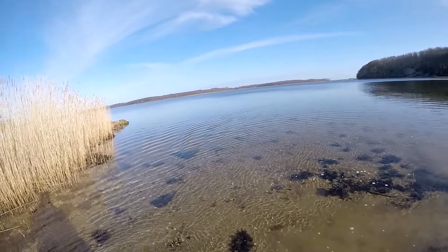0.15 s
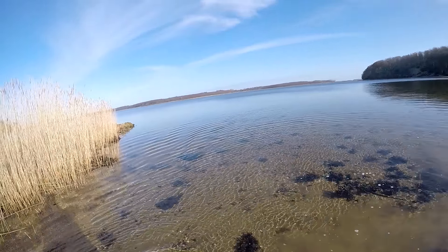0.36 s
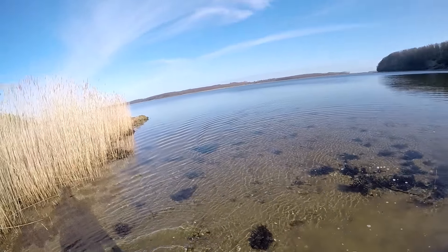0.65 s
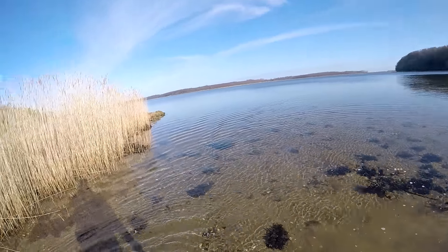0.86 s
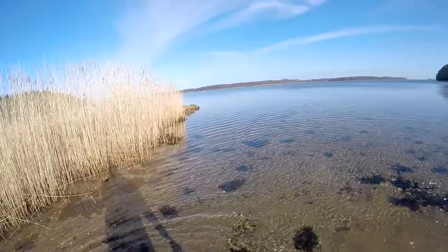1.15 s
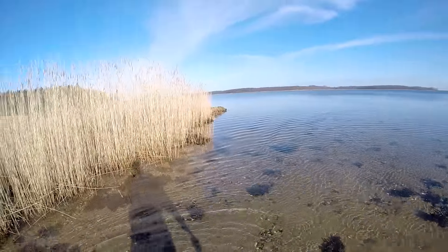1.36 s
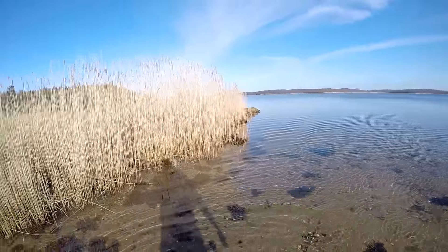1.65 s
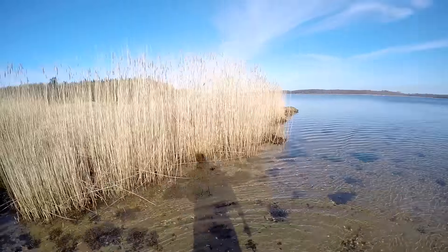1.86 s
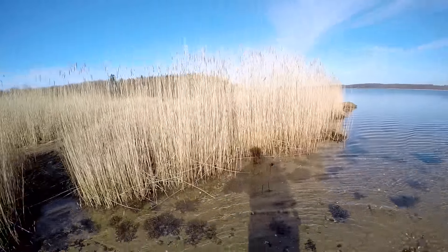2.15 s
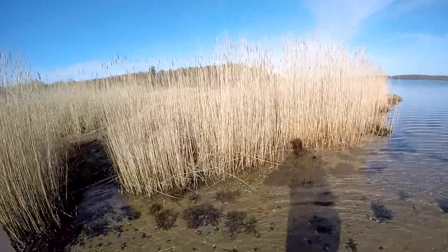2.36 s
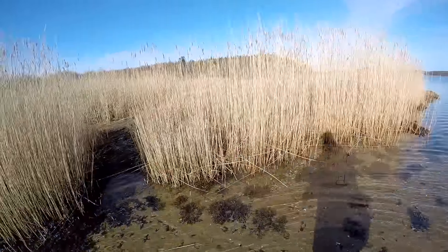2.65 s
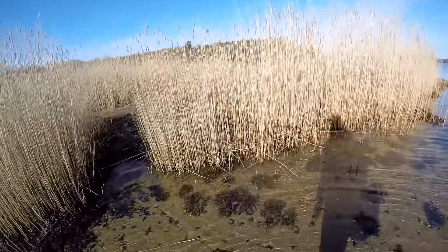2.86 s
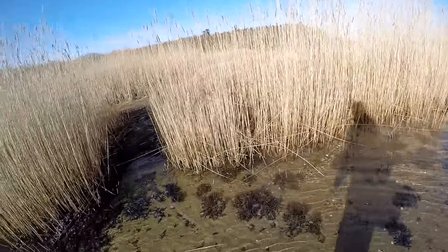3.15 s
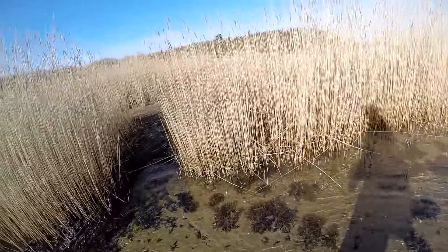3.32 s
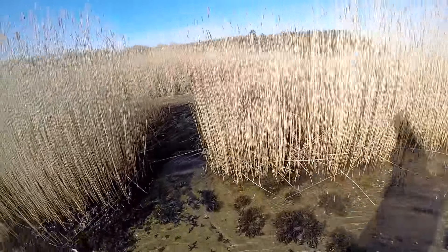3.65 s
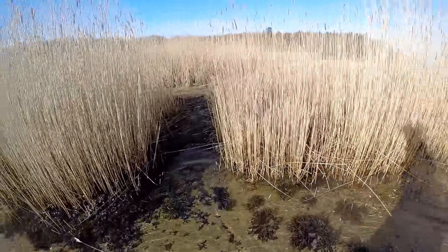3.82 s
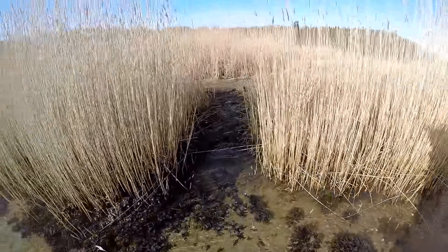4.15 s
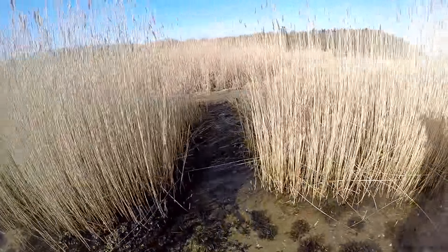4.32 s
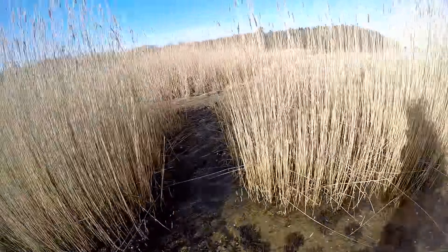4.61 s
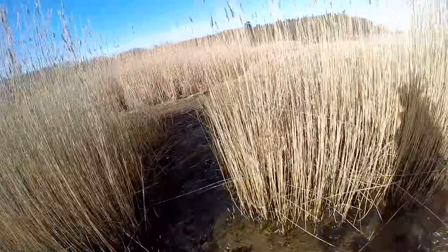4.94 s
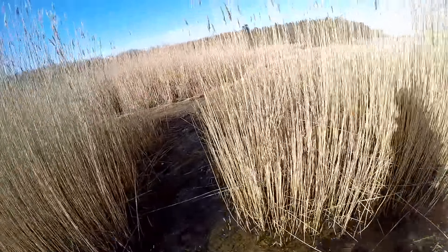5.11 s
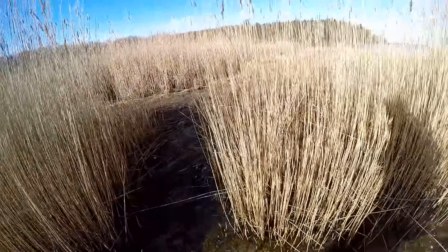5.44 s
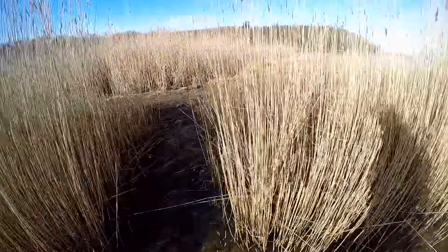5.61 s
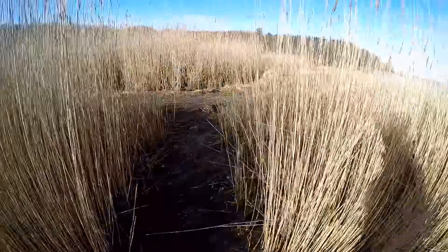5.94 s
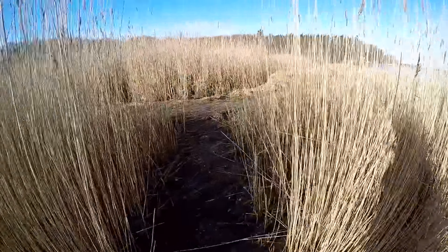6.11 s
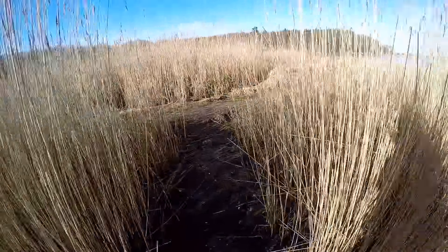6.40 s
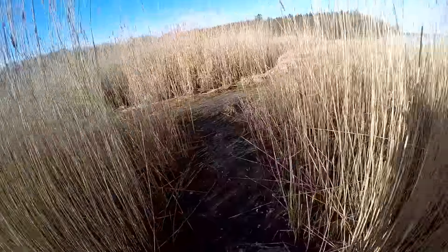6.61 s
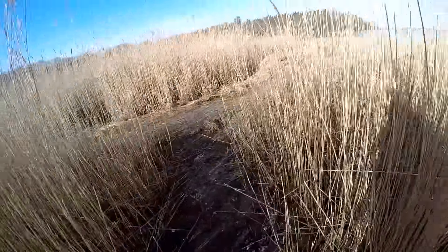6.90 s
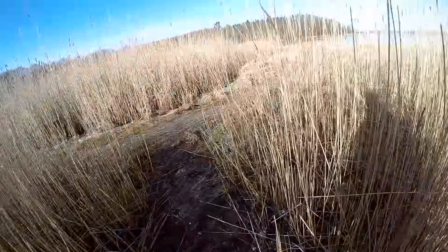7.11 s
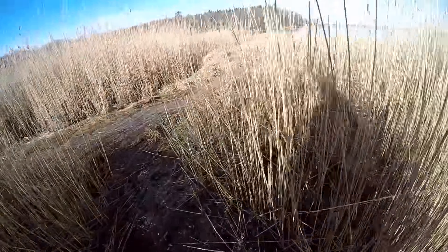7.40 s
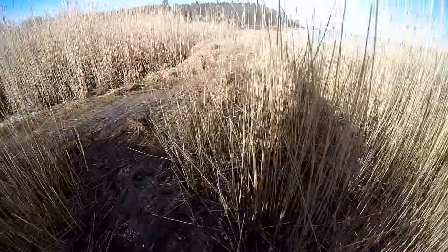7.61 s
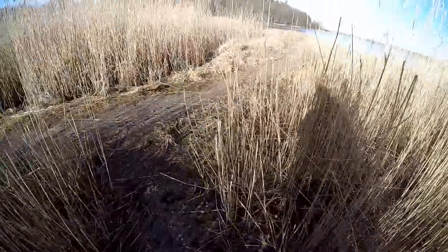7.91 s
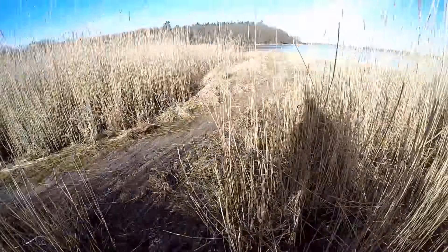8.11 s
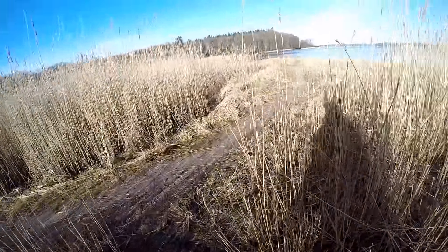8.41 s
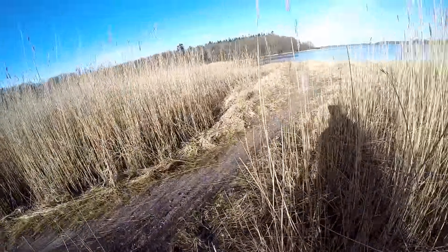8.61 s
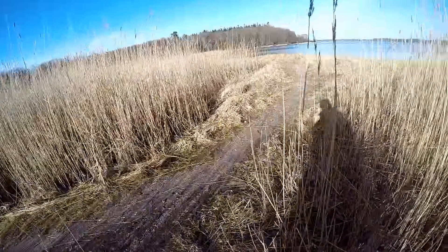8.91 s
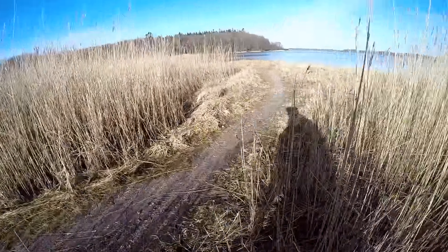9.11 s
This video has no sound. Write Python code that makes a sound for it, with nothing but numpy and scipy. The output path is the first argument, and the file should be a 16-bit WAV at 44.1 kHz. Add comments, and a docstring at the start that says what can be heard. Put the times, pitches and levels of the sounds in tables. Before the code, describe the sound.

Close cloth rubbing and handling bumps give way to a hand chafing on a pole and dry stems brushing and snapping.

```python
"""Reed path at a lake shore

A walker turns and steps along a muddy path through dry reeds, heard from a camera on a hand-held pole.
Right at the microphone, light wind rocks the membrane, cloth wipes the case and jolts thump up the pole.
Then the grip chafes at each step and stems swish and tick close by. A dull rumble swells throughout.
Farther off, reeds and water murmur under the camera's hiss."""
import sys
import numpy as np
from scipy import signal
from scipy.fft import rfft, irfft, next_fast_len
from scipy.io import wavfile
from scipy.ndimage import uniform_filter1d, map_coordinates

SR = 44100
rng = np.random.default_rng(int(sys.argv[2]) if len(sys.argv) > 2 else 0)


def unload_audio(sound):
    """Save the sound as a 16-bit wav file, at the path given as the first command line argument."""
    columns = np.transpose(np.atleast_2d(sound))
    # keep every value between -1 and 1, then stretch to whole-number steps
    steps = np.round(np.clip(columns, -1, 1) * 32767)
    wavfile.write(sys.argv[1], SR, steps.astype(np.int16))


N = 408277

# Wind on the microphone. Each row: time in seconds, level before gusts in dB.
WIND_LEVELS = [(0.0, -56.5), (0.13, -82), (0.2, -45.5), (0.28, -64), (0.46, -70), (0.51, -45), (0.7, -62),
               (0.77, -49), (1.88, -61), (2.13, -51.5), (2.78, -69), (2.88, -61.5), (4.23, -65.5),
               (5.0, -51.5), (5.28, -68), (5.87, -56), (6.65, -62), (6.7, -49), (7.39, -67), (7.55, -51.5),
               (7.88, -65), (8.53, -48), (8.81, -64.5), (9.25, -61.5)]
# Spectra of the rocking membrane, the distant shore, the dull rumble, the shuddering pole and dry leaves.
# Each row: frequency in Hz, relative level in dB.
WIND_SPECTRUM = [(6, -4.5), (12, 0.5), (25, -2.5), (45, -6), (65, -31), (150, -55)]
SHORE_SPECTRUM = [(88, -27), (150, -6), (621, -15.5), (898, -8), (1160, -15.5), (1380, -11), (1920, -13),
                  (2160, -14.5), (3180, -13.5), (3570, -18), (7940, -25.5), (9270, -28.5), (12200, -28),
                  (14200, -31), (15700, -32)]
RUMBLE_SPECTRUM = [(120, 2.5), (190, -2), (300, -4), (450, -8.5), (600, -31.5)]
SHUDDER_SPECTRUM = [(40, -30), (60, 1.5), (100, -3), (150, -9.5), (220, -27), (400, -62)]
LEAF_SPECTRUM = [(2760, -23), (4700, -3.5), (5440, 2.5), (6590, -1), (7070, -3.5), (7510, -7), (9420, -5.5),
                 (12100, -16), (14600, -15), (15700, -41)]
# The camera's two narrow hisses. Each row: centre in Hz, width in Hz, level in dB.
CAMERA_HISSES = [(9450, 520, -91), (14600, 180, -92)]
# Low swells, first under the cloth wipes, then with the walker's movements.
# Each row: peak time, rise and fall in seconds, dull rumble and pole shudder in dB.
LOW_SWELLS = [(0.178, 0.061, 0.18, -68, -64), (.29, 0.21, 0.21, -69, -55.5),
              (.52, .07, 0.042, -64.5, -52.5), (.82, 0.24, 0.15, -79, -58.5),
              (1.03, 0.18, 0.11, -68.5, -56.5), (1.2, 0.089, .1, -62, -49),
              (1.82, 0.084, 0.069, -78, -62.5), (2.14, 0.16, 0.09, -65.5, -56.5),
              (2.27, 0.1, 0.14, -69, -54), (2.42, 0.16, .2, -72.5, -61.5),
              (3.02, 0.19, 0.085, -69.5, -56.5), (3.56, .08, 0.25, -79, -65.5),
              (3.76, 0.18, 0.061, -70.5, -73), (3.94, 0.2, 0.11, -66.5, -63),
              (4.14, .15, 0.18, -73.5, -66.5), (4.37, 0.16, 0.53, -62.5, -60.5),
              (4.48, 0.28, 0.12, -77, -63), (4.78, .03, .06, -69, -55), (4.88, 0.16, .08, -63, -54.5),
              (5.05, 0.13, .1, -70, -58.5), (5.52, 0.42, .1, -68.5, -60.5), (5.66, .1, 0.19, -73, -63.5),
              (5.87, 0.15, .1, -71.5, -58.5), (6.12, 0.099, 0.73, -62.5, -64),
              (6.24, 0.083, .06, -60.5, -55.5), (6.31, .2, 0.072, -63, -56), (6.55, 0.085, .1, -88, -71),
              (6.8, 0.21, 0.09, -55.5, -49.5), (6.88, .05, 0.059, -61, -44.5), (6.93, .04, 0.13, -66, -55),
              (7.22, 0.21, 0.14, -61, -51.5), (7.53, 0.073, 0.095, -69, -54), (7.62, .03, .04, -74, -55),
              (7.72, 0.11, .15, -68, -56), (8.06, 0.2, .1, -67.5, -61), (8.19, 0.17, 0.2, -60, -55),
              (8.28, 0.18, 0.052, -68, -53.5), (8.43, 0.09, .08, -66, -55), (8.54, .06, 0.18, -70, -57),
              (8.86, 0.088, 0.15, -77, -61), (9.255, 0.37, .1, -76, -68)]
# Jolts up the pole. Each row: start in seconds, peak in dB, pitch in Hz, t60 in seconds.
JOLTS = [(0.162, -46, 80, 0.25), (0.505, -37.5, 50, 0.084), (1.16, -41.5, 76.5, 0.074),
         (1.198, -35.5, 84, 0.12), (2.1, -59, 51.1, 0.055), (3.929, -51.5, 105, 0.077),
         (2.995, -60, 80, 0.072), (4.772, -43.5, 91, 0.053), (6.222, -37, 83, 0.059),
         (6.287, -45.5, 80, 0.14), (6.752, -41, 92, 0.069), (6.872, -34, 111, 0.042),
         (7.209, -43, 88, 0.034), (8.279, -39.5, 88.8, 0.029)]
# The camera case. Each row is a group of modes, low to high: centre in Hz, width in Hz, gain in dB.
CASE_GROUPS = [
    [(774, 290, -24), (1275, 340, -7.5), (1470, 117, -1)],
    [(1900, 400, 2), (1970, 170, -3.5), (2140, 61, -6)],
    [(2410, 280, -2), (2644, 170, -0.5), (2800, 140, -1)],
    [(3150, 280, -0.35), (3450, 140, -0.65)],
    [(3750, 540, -1), (4250, 260, 2), (4670, 400, 0.5), (5510, 440, -4)],
    [(6580, 820, 0), (7700, 640, -6), (9070, 1240, -2.5), (10320, 2000, -6.5), (12700, 1600, -5.5),
     (14400, 1300, -11.5)],
]
# How readily the case rings. Each entry: gain in dB for one of the five lower groups.
CASE_GAINS_DB = [-0.95, 0.3, 0.5, -0.5, 1.5]
# Cloth on the case. Each row: peak time, rise and fall in seconds, level in dB, best-driven pitch in
# octaves above 1 kHz, loss above it in dB per octave, hiss of the top group over the level in dB.
CLOTH_STROKES = [(.206, 0.069, 0.067, -63.5, 0.52, 6.5, -4.5), (.27, 0.042, 0.22, -71, 0.69, 6, -5),
                 (.458, 0.011, 0.13, -46.5, 2.5, 2.1, 0), (.495, 0.047, 0.13, -39, 2.25, 4, -4.5),
                 (0.525, 0.048, 0.12, -37, 1.36, 2, -9), (.66, 0.09, 0.43, -48, 1.3, 2.5, -6.5),
                 (.75, 0.15, 0.1, -44, 2.7, 9, -2.5), (.85, 0.25, 0.079, -41, 1.33, 2.5, -10.5),
                 (.96, 0.17, 0.14, -46.5, 0.61, 8.5, -15), (1.06, 0.024, 0.076, -52, 0.7, 8, -13),
                 (1.13, 0.049, 0.089, -52, 0.94, 11.5, -15), (1.175, 0.044, 0.053, -46, 1.2, 7, -12),
                 (1.234, 0.074, 0.06, -33.5, 0.25, 3.5, -10.5), (1.273, 0.068, 0.017, -43, 0.29, 1.5, -6.5),
                 (1.31, 0.055, 0.055, -62, 0.52, 4, -19), (1.78, 0.019, 0.078, -59.5, 0.64, 6, -19),
                 (1.83, 0.09, 0.023, -61.5, 0.74, 3, -16), (1.97, 0.049, .15, -64, 0.6, 6, -10.5),
                 (2.054, 0.083, 0.18, -54.5, 1.03, 13, -17), (2.125, 0.1, 0.052, -47.5, 1.2, 4, -10.5),
                 (2.19, 0.075, 0.12, -59, 1.87, 30, -4), (2.3, .1, 0.13, -67.5, 1.7, 23, -17),
                 (2.422, 0.036, 0.18, -72, 0.5, 4, -7), (2.486, 0.26, 0.11, -66, 0.72, 7, -13)]
# Stems snapping close by. Each row: start in seconds, peak in dB, brightest frequency in Hz.
STEM_SNAPS = [(.2704, -54, 3280), (0.4552, -28, 4630), (1.0535, -43, 3530), (1.531, -48.5, 4380),
              (2.121, -36, 3330), (2.2467, -48, 3310), (2.4164, -55, 3320), (3.7654, -66, 4120),
              (3.8082, -58, 5240), (3.8287, -49, 3320), (4.0262, -55, 5310), (4.154, -56, 3300),
              (4.6548, -48, 3740), (4.6897, -51, 4250), (4.7044, -49, 3460), (4.954, -51, 4300),
              (5.6271, -47, 3360), (5.69, -48.5, 3370), (5.7494, -53, 3560), (5.8144, -61, 3420),
              (5.851, -42, 3360), (5.91, -52, 4210), (6.3093, -53, 4530), (6.6493, -48, 4330),
              (6.711, -46, 4300), (6.9094, -52, 4300), (6.939, -60, 5610), (6.9626, -51, 4330),
              (7.454, -53, 9100), (7.5335, -55, 3300), (7.648, -53.5, 3690), (8.3938, -58, 3910),
              (8.5253, -57, 3560)]
# Taps on the pole. Each row: start in seconds, peak in dB, favoured pitch in Hz, t60 in seconds.
POLE_TAPS = [(1.198, -27.5, 1520, 0.035), (1.529, -39.5, 2600, 0.014), (1.702, -58, 2570, 0.027),
             (2.104, -39, 1890, 0.021), (2.535, -50, 2690, 0.028), (3.277, -57.5, 824, 0.031),
             (3.626, -55, 1090, 0.025), (4.751, -42.5, 1860, 0.054), (6.841, -38, 2900, 0.027),
             (6.866, -52, 2070, 0.03), (6.918, -53, 1340, 0.057), (6.955, -54, 1043, 0.021),
             (7.677, -58, 1900, 0.025), (8.382, -55, 960, 0.024), (8.423, -52, 1570, 0.025)]
# Lower and upper modes of the pole; hollow stalks. Each row: centre in Hz, width in Hz, gain in dB.
POLE_MODES = [(807, 91, -7), (1020, 118, -4), (1330, 84, -3), (1523, 250, -5.5), (1864, 137, -0.5),
              (2280, 660, -20.5)]
RASP_MODES = [(2670, 330, -2.5), (2905, 250, 1), (3174, 200, -2.5)]
STALK_MODES = [(3070, 390, 0.5), (3740, 790, -1.5), (4320, 120, 2)]
# The pole's broad response around its modes. Each row: frequency in Hz, gain in dB.
POLE_SKIRT = [(600, -33), (750, -9), (2300, -13.5), (3600, -53), (5000, -32), (9000, -65)]
# The hand on the pole. Each row: peak time, rise and fall in seconds, level in dB, rasp over it in dB.
GRIP_CHAFES = [(3.04, 0.29, 0.048, -65.5, -5), (3.28, .015, 0.037, -81, -6), (3.52, 0.045, 0.038, -70, -6),
               (3.65, .1, 0.16, -70.5, -4), (3.82, 0.28, .06, -64.5, -4), (3.93, 0.094, .1, -55, -3.5),
               (4.14, 0.15, 0.057, -61, -5.5), (4.362, 0.12, 0.13, -55.5, -2), (4.48, .15, 0.16, -63, -2.5),
               (4.77, 0.02, 0.024, -55.5, -7), (4.88, 0.55, .09, -62.5, -1), (5.03, .3, 0.14, -69, -6),
               (5.29, .03, .3, -71.5, -13), (5.5, 0.16, 0.17, -57.5, -2), (5.69, 0.33, 0.28, -63.5, -1),
               (5.91, 0.25, 0.044, -60.5, -10), (6.12, 0.076, 0.34, -57, -5.5), (6.29, 0.29, 0.11, -59, -2),
               (6.58, 1, 0.22, -70, 3.8), (6.68, 0.17, 0.084, -59.5, -16),
               (6.789, 0.098, 0.12, -46.5, -1.2), (6.868, 0.0052, 0.013, -44.5, -6),
               (6.922, 0.031, 0.04, -56, -7), (6.969, 0.052, 0.09, -63, -11), (7.089, 0.17, .2, -67, -6),
               (7.211, 0.12, 0.082, -50, -5.5), (7.262, 0.12, 0.028, -52, -3.5),
               (7.36, 0.089, 0.12, -79, 10.5), (7.52, 0.044, 0.11, -59, -2),
               (7.685, 0.02, 0.082, -57, -3.5), (7.76, 0.14, 0.05, -63, -4), (7.89, 0.049, 0.041, -75.5, 0),
               (8.02, 0.15, 0.25, -63.5, -5.5), (8.16, 0.17, 0.18, -58, -2),
               (8.27, 0.26, 0.07, -55.5, -3.5), (8.39, .03, .04, -64, -15), (8.435, 0.027, 0.029, -57, -15),
               (8.53, 0.061, 0.12, -65.5, -4), (8.98, 0.13, 0.11, -76, -4), (9.11, 0.26, 0.08, -69, -2),
               (9.255, .1, .1, -74, -5)]
# Stems along the walker. Each row: peak time, rise and fall in seconds, stalks and leaves in dB.
REED_BRUSHES = [(2.8, .3, 0.19, -75, -85), (3.04, 0.17, .12, -63.5, -73), (3.78, 0.23, 0.026, -74, -78),
                (3.89, 0.14, 0.2, -67, -71.5), (3.95, 0.21, 0.014, -65, -65.5),
                (4.06, .4, 0.51, -76.5, -81), (4.36, .1, 0.37, -74, -79), (4.68, .4, .1, -79, -79),
                (4.76, 0.14, 0.37, -67, -72.5), (4.9, 0.39, 0.14, -66, -66.5), (5.5, 0.13, .8, -69.5, -77),
                (5.69, 0.72, .17, -70, -72.5), (5.86, 0.055, 0.012, -64, -77),
                (5.91, 0.016, 0.044, -75, -70), (6.06, 0.11, 0.23, -56.5, -66.5),
                (6.15, 0.19, 0.082, -58.5, -67), (6.298, 0.068, .6, -70.5, -74),
                (6.53, 0.17, 0.75, -68.5, -66.5), (6.72, 0.68, 0.32, -70, -72),
                (6.86, 0.12, 0.1, -74, -65.5), (7.24, 0.26, .15, -69, -76.5), (7.43, 0.73, 1, -77.5, -75.5),
                (8.17, 0.29, 0.32, -73, -77.5), (8.45, .6, .2, -76.5, -78), (9.255, .05, .1, -70, -74)]
# Drip-like pings, then mud plops. Each row: start in seconds, peak in dB, pitch in Hz, t60 in seconds.
PINGS = [(3.5423, -63, 2920, 0.027), (3.7823, -56.5, 4180, 0.028), (5.7638, -51.5, 2480, 0.027),
         (6.5879, -50, 1730, 0.023), (7.3692, -56.5, 3000, 0.047), (7.882, -54, 1660, 0.027),
         (8.7774, -62.5, 3100, 0.03)]
MUD_PLOPS = [(5.018, -56, 302, 0.04), (8.715, -56.5, 328, 0.019)]


def amp(db):
    """Gain of a level in dB."""
    return 10 ** (np.asarray(db) / 20)


def unit(x):
    """x at rms 1."""
    return x / np.sqrt(np.mean(x ** 2) + 1e-20)


def wobble(rate):
    """A smooth random curve, rate knots a second."""
    knots = rng.standard_normal(int(N * rate / SR) + 6)
    coarse = np.arange(0, N + 16, 16)
    return np.interp(np.arange(N), coarse, map_coordinates(knots, [coarse * rate / SR]))


def filtered(x, response):
    """x through a frequency response, read on a fine log grid."""
    size = next_fast_len(len(x) + 8192)
    grid = np.geomspace(1, SR / 2, 4096)
    gain = np.interp(np.fft.rfftfreq(size, 1 / SR), grid, response(grid))
    return irfft(rfft(x, size) * gain, size)[:len(x)]


def shape(points):
    """Response through (Hz, dB) points, silent beyond the ends."""
    f, db = np.transpose(points)
    return lambda hz: amp(np.interp(np.log(hz + 1), np.log(f + 1), db, left=-120, right=-120))


def modes(table, steep):
    """Response of resonances added in power; steep darkens the valleys between them."""
    return lambda hz: np.sqrt(sum(amp(db) ** 2 / (1 + ((hz - centre) / (width / 2)) ** 2) ** steep
                                  for centre, width, db in table))


def swells(rows, levels_db):
    """Movements (peak, rise, fall) added in power: one gain curve for each column of levels."""
    peak, rise, fall = np.array(rows)[:, :3].T[:, :, None]
    t = np.arange(0, N + 64, 64) / SR
    away = np.maximum((peak - t) / rise, (t - peak) / fall)
    power = amp(-40 * np.minimum(away, 8) ** 1.153)  # the exponent rounds the top a little
    return [np.interp(np.arange(N) / SR, t, np.sqrt(amp(2 * db) @ power)) for db in levels_db]


def lumpy(spectrum, lump_db):
    """Low noise of rms 1 that comes in lumps."""
    return unit(filtered(rng.standard_normal(N) * amp(lump_db * wobble(25)), shape(spectrum)))


def rustle(response, grain_db, lump_db, patch_db):
    """Friction noise of rms 1: fibres catch in fast grains and slower lumps, in patches of colour."""
    friction = rng.standard_normal(N) * amp(grain_db * wobble(400) + lump_db * wobble(35))
    spectra = signal.stft(friction, nperseg=512)[2]
    patches = uniform_filter1d(rng.standard_normal(spectra.shape), size=6, axis=0)
    patches = unit(uniform_filter1d(patches, size=8, axis=1))
    patchy = signal.istft(spectra * amp(patch_db * patches), nperseg=512)[1][:N]
    return unit(filtered(patchy, response))


def damped_swings(table, rise_s, rough):
    """Short decaying tones with a soft start, roughened by phase drift."""
    out, t = np.zeros(N + SR), np.arange(SR // 5) / SR
    for start, db, hz, t60 in table:
        drift = rough * np.cumsum(rng.standard_normal(len(t))) * np.sqrt(hz / SR)
        swing = np.sin(2 * np.pi * hz * t + drift) * amp(-60 * t / t60) * (1 - np.exp(-t / rise_s))
        out[round(start * SR):][:len(t)] += amp(db) * swing / np.abs(swing).max()
    return out[:N]


def wind(gust_db=4):
    """Light wind rocks the microphone's membrane in quick gusts."""
    times, db = np.transpose(WIND_LEVELS)
    strength = amp(np.interp(np.arange(N) / SR, times, db, right=-140))
    return strength * amp(gust_db * wobble(6)) * lumpy(WIND_SPECTRUM, lump_db=-0.2)


def far_shore(level_db=-73):
    """Reeds and water murmur in the distance."""
    return amp(level_db) * rustle(shape(SHORE_SPECTRUM), grain_db=0.95, lump_db=0.18, patch_db=1.6)


def camera_hiss():
    """The camera adds two steady, narrow bands of high noise."""
    return sum(amp(db) * unit(filtered(rng.standard_normal(N), modes([(hz, width, 0)], steep=1.5)))
               for hz, width, db in CAMERA_HISSES)


def low_swells(rumble_rest_db=-85, shudder_rest_db=-73):
    """Dull rumble and pole shudder, first under the cloth wipes, then with the walker's movements."""
    rumble_gain, shudder_gain = swells(LOW_SWELLS, np.transpose(LOW_SWELLS)[3:])
    rumble = np.hypot(rumble_gain, amp(rumble_rest_db)) * lumpy(RUMBLE_SPECTRUM, lump_db=1.0)
    shudder = np.hypot(shudder_gain, amp(shudder_rest_db)) * lumpy(SHUDDER_SPECTRUM, lump_db=3.5)
    return rumble + shudder


def pole_jolts():
    """A jolt thumps up the pole into the microphone and first pulls the membrane back."""
    return -damped_swings(JOLTS, rise_s=0.0029, rough=0.083)


def cloth_wipe(loss_below_db_per_octave=9.5):
    """Cloth drags over the case, right at the microphone; the place of contact picks which modes ring."""
    db, best_octave, loss_above, hiss_db = np.transpose(CLOTH_STROKES)[3:]
    levels_db = []
    for group, gain_db in zip(CASE_GROUPS, CASE_GAINS_DB):
        octaves_above = np.mean(np.log2(np.transpose(group)[0] / 1000)) - best_octave
        slope = np.where(octaves_above > 0, loss_above, loss_below_db_per_octave)
        levels_db.append(db + gain_db - slope * np.abs(octaves_above))
    forces = swells(CLOTH_STROKES, levels_db + [db + hiss_db])
    return sum(force * rustle(modes(group, steep=1.625), grain_db=1.5, lump_db=1.82, patch_db=1.37)
               for force, group in zip(forces, CASE_GROUPS))


def stem_snaps(t60_s=0.013):
    """A dry stem snaps close by in a few milliseconds: one bright region over a weaker crack."""
    out, t = np.zeros(N + SR), np.arange(1500) / SR
    crack = shape([(600, -31), (2500, -16), (7500, -15), (11000, -19.5), (16000, -24)])
    lead = 64  # samples of room for the filter to ring ahead of the burst
    for start, db, hz in STEM_SNAPS:
        burst = rng.standard_normal(len(t)) * amp(-60 * t / t60_s)
        bright = modes([(hz, 0.3 * hz, 0)], steep=1.5)
        snap = filtered(np.pad(burst, (lead, 0)), lambda f: np.hypot(bright(f), crack(f)))
        out[round(start * SR):][:len(snap)] += amp(db) * snap / np.abs(snap).max()
    return out[lead:N + lead]


def pole_taps(loss_db_per_octave=16):
    """A tap rings the modes of the pole, most of all those near its favoured pitch."""
    out, t = np.zeros(N + SR), np.arange(SR // 10) / SR
    hz, _, mode_db = np.transpose(POLE_MODES + RASP_MODES)[:, :, None]
    for start, db, favoured_hz, t60 in POLE_TAPS:
        octaves_away = np.abs(np.log2(hz / favoured_hz))
        gains = amp(mode_db - loss_db_per_octave * octaves_away + rng.normal(0, 2.0, hz.shape))
        ring = (gains * np.sin(2 * np.pi * hz * t)).sum(axis=0) * amp(-60 * t / t60)
        out[round(start * SR):][:len(t)] += amp(db) * ring / np.abs(ring).max()
    return out[:N]


def grip_chafe(fidget_from_s=1.8, fidget_db=-84.5, fidget_depth_db=4.5):
    """The hand chafes through the modes of the pole; between chafes the fingers keep shifting."""
    db, rasp_db = np.transpose(GRIP_CHAFES)[3:]
    chafe_gain, rasp_gain = swells(GRIP_CHAFES, [db, db + rasp_db])
    fidget = amp(fidget_db + fidget_depth_db * wobble(13)) * (np.arange(N) > fidget_from_s * SR)
    pole = lambda hz: np.hypot(modes(POLE_MODES, steep=1.6)(hz), shape(POLE_SKIRT)(hz))
    chafe = rustle(pole, grain_db=2.05, lump_db=0.17, patch_db=1.4)
    rasp = rustle(modes(RASP_MODES, steep=2.05), grain_db=2.2, lump_db=0.65, patch_db=1.3)
    return np.hypot(chafe_gain, fidget) * chafe + np.hypot(rasp_gain, fidget * amp(-3)) * rasp


def reed_swish():
    """Hollow stalks and dry leaves rub along the walker, close to the microphone."""
    stalk_gain, leaf_gain = swells(REED_BRUSHES, np.transpose(REED_BRUSHES)[3:])
    stalks = rustle(modes(STALK_MODES, steep=1.36), grain_db=2.3, lump_db=2.0, patch_db=0.92)
    leaves = rustle(shape(LEAF_SPECTRUM), grain_db=2.7, lump_db=1.0, patch_db=1.8)
    return stalk_gain * stalks + leaf_gain * leaves + leaf_crackle(leaf_gain)


def leaf_crackle(leaf_gain, count=900, centre_hz=6550, decay_cycles=2.7):
    """Tiny breaks of dry leaf: damped grains of scattered pitch and size that follow the swish."""
    starts = (rng.random((count, 1)) * N).astype(int)
    hz = np.clip(centre_hz * np.exp(0.4 * rng.standard_normal((count, 1))), 2500, 14000)
    size_db = -8 + 2.4 * np.minimum(rng.exponential(size=(count, 1)), 4)
    age = np.arange(160)
    cycles = hz * age / SR
    grains = leaf_gain[starts] * amp(size_db) * np.sin(2 * np.pi * cycles) * np.exp(-cycles / decay_cycles)
    return np.bincount((starts + age).ravel(), grains.ravel(), N + len(age))[:N]


def pings():
    """Short pitched pings, like drips."""
    return damped_swings(PINGS, rise_s=0.00069, rough=0.2)


def mud_plops():
    """Down on the path, mud lets go of a boot with a low, rough plop."""
    return damped_swings(MUD_PLOPS, rise_s=0.002, rough=1.0)


def scene():
    """Everything reaches the one microphone on the pole."""
    accents = stem_snaps() + pole_taps() + pings() + mud_plops()
    close = wind() + cloth_wipe() + grip_chafe() + reed_swish() + low_swells() + pole_jolts()
    return (accents + close + camera_hiss() + far_shore())[None]


def record(dry):
    """The camera fades at the top of its band and keeps nothing above the limit."""
    limit_hz = 15840
    fade = lambda hz: amp(np.interp(hz, [15200, 15400, 15790], [0, -6, -10.5]))
    return filtered(dry[0], lambda hz: fade(hz) * (hz < limit_hz))[None]


dry = scene()
out = record(dry)
unload_audio(out)
```